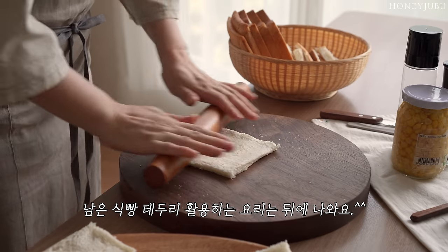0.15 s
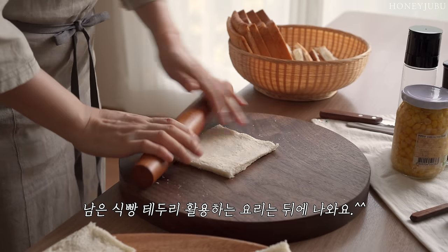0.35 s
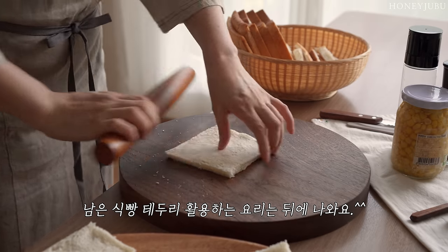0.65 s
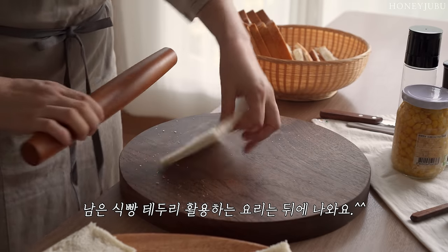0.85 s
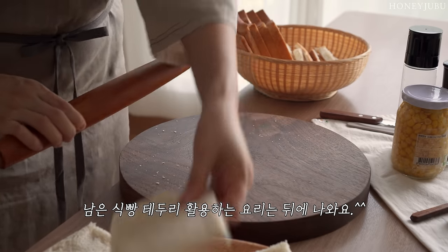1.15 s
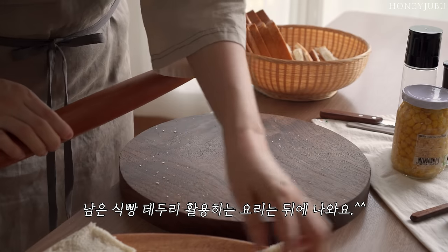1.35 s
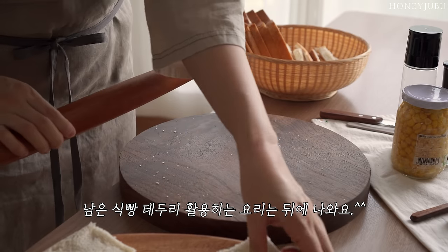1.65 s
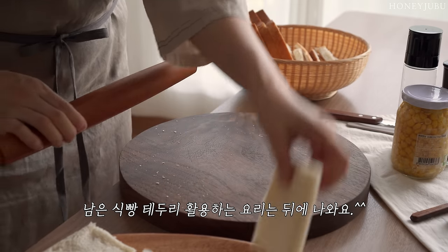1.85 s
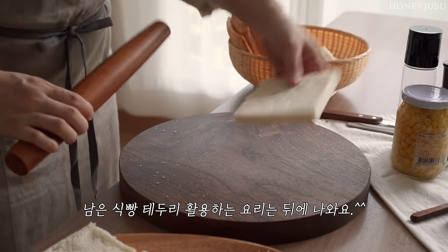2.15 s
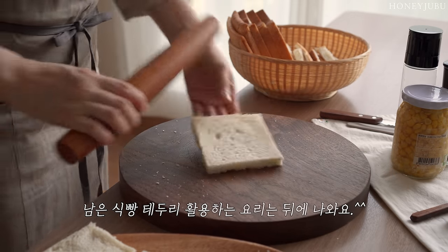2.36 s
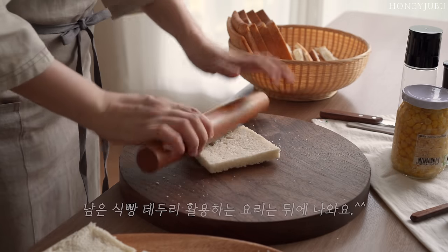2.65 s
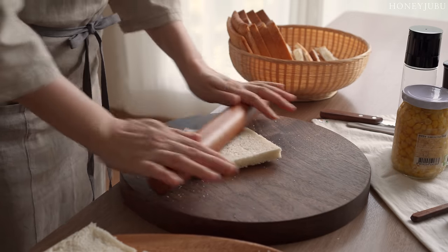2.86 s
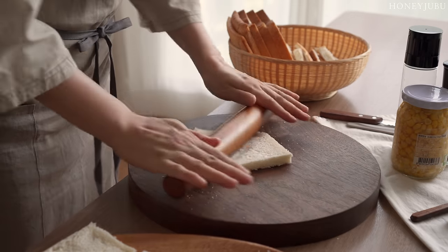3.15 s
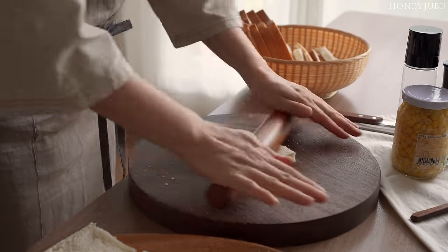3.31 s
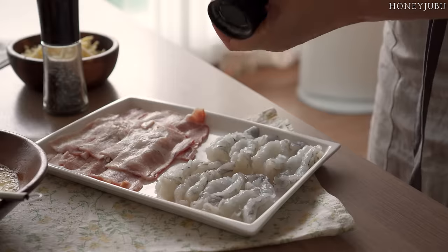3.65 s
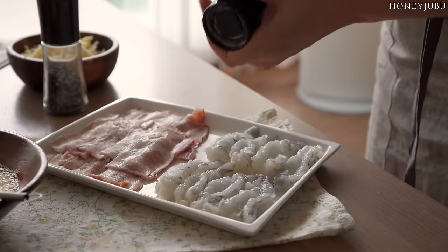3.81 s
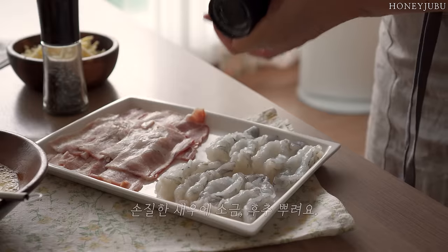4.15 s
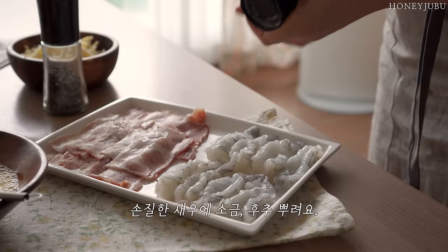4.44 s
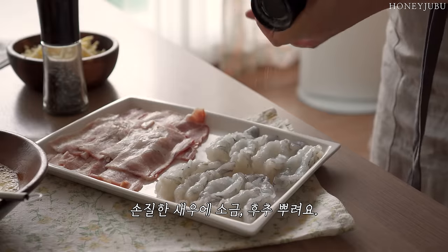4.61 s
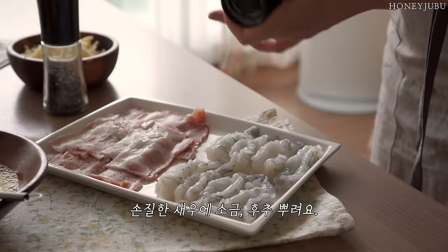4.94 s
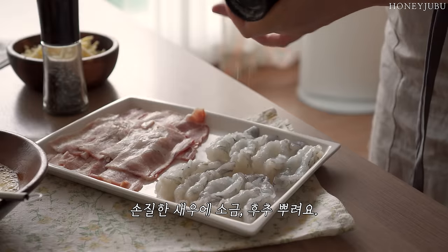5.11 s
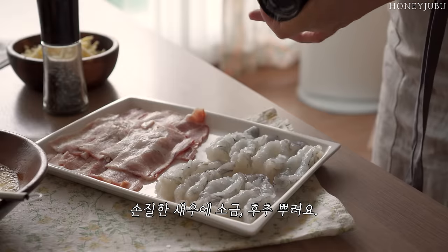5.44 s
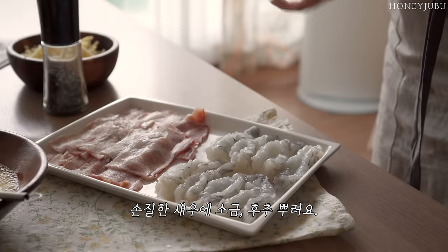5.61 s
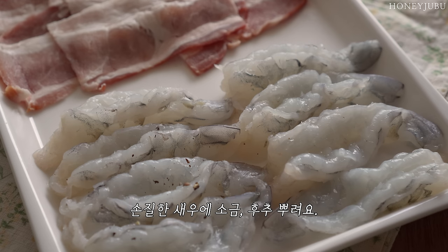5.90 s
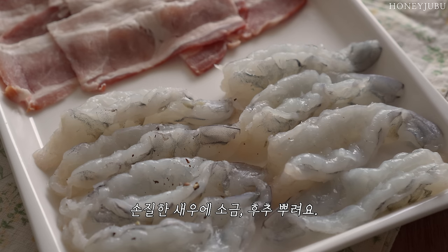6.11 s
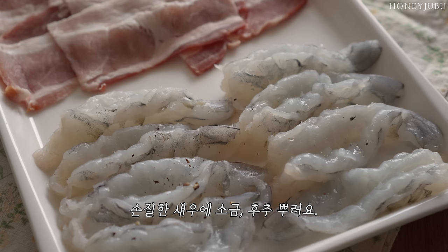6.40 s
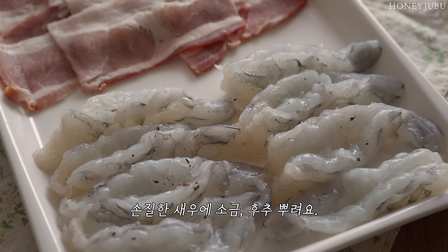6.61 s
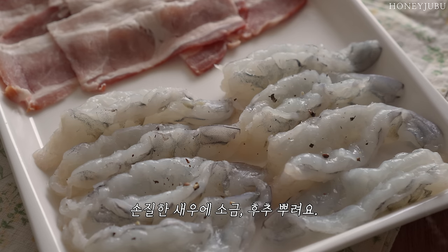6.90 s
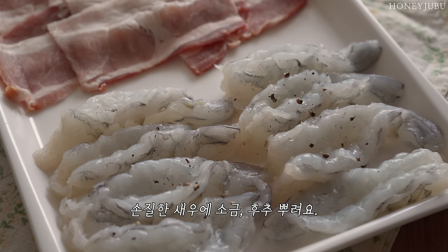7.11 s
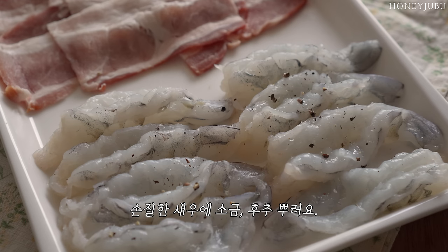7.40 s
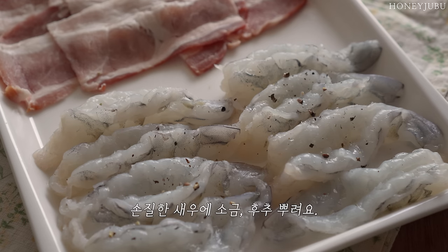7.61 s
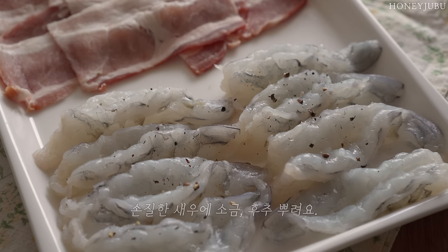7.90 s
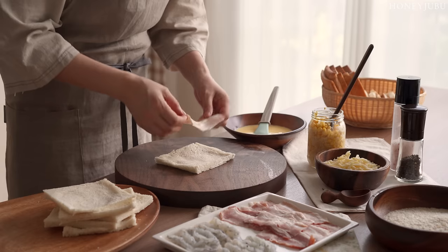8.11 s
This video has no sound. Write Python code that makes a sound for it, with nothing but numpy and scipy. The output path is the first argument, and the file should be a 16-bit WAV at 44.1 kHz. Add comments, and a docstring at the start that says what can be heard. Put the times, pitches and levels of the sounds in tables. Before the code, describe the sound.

A faint hush of fridge and air fills a small kitchen. Right at the start a rolling pin knocks on a thick wooden board, then again, louder, at 0.3 seconds, ringing briefly and bouncing at 0.5. Until about 3.4 seconds fingers and bread slices tap lightly on the board and a plate, clearest twice around 1.6, while palms rub very softly; a dull little knock comes at 3.1. At 3.4 the sound jumps to a salt mill twisted quickly to and fro, about seven strokes a second, with crunching, a bright gritty hiss and sharp cracks of single grains. At 5.8 it changes abruptly to a quieter, drier pepper mill with an even crunch, loud snaps around 6.3 and 6.5, and a very faint tinkle of loose grains. The grinding stops just after 8.1, leaving the hush. Everything is close and louder on the left.

```python
"""Over a faint hush of fridge and air, a rolling pin knocks on a thick wooden board and makes it ring.
Fingers and bread slices tap the board and a plate, and palms rub softly over pin, bread and cloth.
Then a salt mill and a pepper mill are twisted to and fro: grains crush between the burrs (the grinding
teeth), grit hisses and single grains crack. The sound jumps abruptly from one job to the next
and is louder on the left."""
import sys
import numpy as np
from scipy import signal
from scipy.fft import rfft, irfft
from scipy.io import wavfile

SR = 44100
rng = np.random.default_rng(int(sys.argv[2]) if len(sys.argv) > 2 else 0)


def to_wav(sig):
    """Store sig (one row per channel, or 1-D mono) as 16-bit WAV at the path in sys.argv[1].

    Samples outside -1..1 are clipped; the rate is SR.
    """
    pcm = np.clip(np.atleast_2d(sig), -1, 1) * 32767
    pcm = np.round(pcm).astype(np.int16)
    wavfile.write(sys.argv[1], SR, pcm.T)  # frames by channels


N = 364266


def from_db(db):
    """Turn decibels into a gain to multiply by."""
    return 10 ** (np.asarray(db) / 20)


def rms_one(x):
    """Scale a sound to an average (rms) level of 1."""
    return x / np.sqrt(np.mean(x ** 2) + 1e-20)


def spectrum_gains(spectrum, size):
    """Join (Hz, dB) points into one gain for each frequency in a sound of this size."""
    hz, db = np.transpose(spectrum)
    freqs = np.maximum(np.arange(size // 2 + 1) * SR / size, 1)
    return from_db(np.interp(np.log(freqs), np.log(hz), db))


def coloured(x, spectrum):
    """Give a sound the tone colour of these (Hz, dB) points, at level 1."""
    return rms_one(irfft(rfft(x) * spectrum_gains(spectrum, len(x)), len(x)))


def causal_click(spectrum, size=8192):
    """The shortest click with this tone colour (minimum phase)."""
    cepstrum = irfft(np.log(spectrum_gains(spectrum, size)), size)
    cepstrum[1:size // 2] *= 2
    cepstrum[size // 2 + 1:] = 0
    click = irfft(np.exp(rfft(cepstrum)), size)
    return click / np.abs(click).max()


def band(x, low_hz, high_hz):
    """Keep what lies between two frequencies."""
    edges = [low_hz, min(high_hz, .45 * SR)]
    return signal.sosfilt(signal.butter(2, edges, "band", fs=SR, output="sos"), x)


def resonance(x, hz, width_hz):
    """Ring at one pitch; the narrower the width, the longer the ring."""
    r = np.exp(-np.pi * width_hz / SR)
    gain = (1 - r * r) / 2
    return signal.lfilter([gain, 0, -gain], [1, -2 * r * np.cos(2 * np.pi * hz / SR), r * r], x)


def body(x, modes):
    """An object rings at several pitches at once, called its modes."""
    return sum((-1) ** k * from_db(db) * resonance(x, hz, width)
               for k, (hz, width, db) in enumerate(modes))


def grains(per_s, spread_db, bed):
    """Random clicks of uneven size over a bed of smooth noise."""
    sizes = from_db(spread_db * np.minimum(rng.exponential(1, N), 3.2)) * rng.choice([-1, 1], N)
    clicks = sizes * (rng.random(N) < per_s / SR)
    return rms_one(clicks) + bed * rng.standard_normal(N)


def add(out, start_s, peak_db, piece):
    """Lay a short sound in at its time and peak level."""
    i = round(start_s * SR)
    out[i:i + len(piece)] += from_db(peak_db) * piece[:N - i] / np.abs(piece).max()


def strokes(rows, shapes):
    """Hand strokes rise, hold and fall above a resting level. Gives one dB curve per level column."""
    t = np.arange(0, N / SR + .002, .001)
    start, hold, *levels = np.transpose(rows)[:, :, None]
    early, late = np.maximum(start - t, 0), np.maximum(t - start - hold, 0)
    powers = [from_db(2 * rest_db) + from_db(2 * (db - rise * early - fall * late)).sum(axis=0)
              for db, (rise, fall, rest_db) in zip(levels, shapes)]
    return [np.interp(np.arange(N) / SR, t, 10 * np.log10(power)) for power in powers]


# The colour of the hush. Each row: frequency in Hz, relative level in dB.
HUSH_COLOUR = [(15, -12), (25, -8), (55, -4), (74, -9), (92, -6.5), (157, -6.5), (301, -10), (363, -14),
               (476, -17), (796, -20.5), (887, -24.5), (1160, -23.5), (1890, -34), (2050, -33),
               (16000, -47.5)]
# Its level in dB during the bread, the salt, the pepper and the quiet ending.
HUSH_LEVELS = [-63, -60, -65.5, -61.5]
def hush(job):
    """Fridge and air make a low, soft noise, with one level for each job."""
    return from_db(HUSH_LEVELS)[job] * coloured(rng.standard_normal(N), HUSH_COLOUR)


# Background tones. Each row: start and end in seconds, pitch in Hz, width in Hz, level in dB.
HUM_TONES = [(0, 3.42, 99, 30, -66.5), (2.718, 3.5, 1740, 42, -81.5), (2.72, 3.16, 3700, 240, -75.5),
             (3.7, 4.9, 91, 18, -63.5), (4.3, 5.6, 177, 12, -64.5), (5.8, 16, 100.4, 25, -73),
             (8.16, 10.4, 543, 7.1, -68)]
def hums():
    """Noise narrowed to one pitch makes a wavering hum or a faint whistle."""
    t, out = np.arange(N) / SR, 0
    for start, end, hz, width_hz, db in HUM_TONES:
        tone = resonance(resonance(rng.standard_normal(N), hz, width_hz), hz, width_hz)
        fade = np.clip(np.minimum(t - start, end - t) / .0088, 0, 1)
        out = out + from_db(db) * rms_one(tone) * fade
    return out


# Wood hits wood. Each row: start in seconds, level in dB, contact time in milliseconds.
# The last three rows are the pin bouncing.
PIN_KNOCKS = [(.0172, -12.5, .07), (.3345, -4.7, .017), (.549, -30, .15), (.799, -38, .25),
              (1.165, -54, .3), (3.121, -39, .4), (.4925, -24, .22), (.4985, -25, .22), (.513, -29, .18)]
# How pin and board ring. Each row: pitch in Hz, width in Hz, level in dB.
BOARD_MODES = [(217, 24.6, -10), (310, 40, -8.5), (475, 46, -20.5), (555.4, 28, -15), (682, 60, -5.5),
               (1020, 80, 2.5), (1163, 48, 2), (1337, 27, -2), (1690, 180, -1.5), (2360, 160, 2.5),
               (3700, 90, -9), (5650, 39, -21.5)]
# The broad clack of the wood. Each row: frequency in Hz, relative level in dB.
CLACK_COLOUR = [(40, -40), (90, -10.5), (150, -14), (230, -16.5), (600, -7), (850, -16.5), (1350, -10.5),
                (2300, -13.5), (3050, -23), (3700, -24), (4700, -25.5), (5200, -37.5), (5650, -30.5),
                (6300, -50.5), (14000, -72)]
def pin_knocks():
    """The pin hits the board; a longer contact sounds duller. Gives the clack and the ring apart."""
    out, clack = np.zeros((2, N)), causal_click(CLACK_COLOUR)
    t = np.arange(len(clack)) / SR
    for start, level_db, contact_ms in PIN_KNOCKS:
        luck_db = rng.normal(0, 1.5, len(BOARD_MODES))
        ring = sum((-1) ** k * from_db(db + luck_db[k])
                   * np.exp(-np.pi * width * t) * np.sin(2 * np.pi * hz * t)
                   for k, (hz, width, db) in enumerate(BOARD_MODES))
        dulling = np.exp(-1000 / (contact_ms * SR))
        blow = signal.lfilter([1], [1, -2 * dulling, dulling ** 2], [.9 * clack, .52 * ring])
        blow = band(blow, 100, 20000)   # the small pin radiates little bass
        i = round(start * SR)
        out[:, i:i + len(t)] += from_db(level_db) * blow / np.abs(blow[1]).max()
    return out


def burst(out, event, modes, thud_modes, rattle_s, damping):
    """A tiny rattle swells and dies, heard as a ringing crack, a bright snap and a thud."""
    start, peak_db, hz, snap_db, thud_db = event
    t = np.arange(4000) / SR
    swell = t / rattle_s * np.exp(-t / rattle_s) + .087 * np.exp(-t / .005)
    rattle = rng.standard_normal(len(t)) * swell
    rattle[round(rattle_s * SR)] = .9   # the sharp click itself
    struck = [(pitch, width, db + rng.normal(0, 3.5)) for pitch, width, db in modes]
    crack = resonance(rattle, hz, damping * hz) + .55 * body(rattle, struck)
    add(out, start, peak_db, band(crack, 500, 5600))
    add(out, start, peak_db + snap_db, band(rattle, 6900, 11000))
    add(out, start, peak_db + thud_db, body(rattle, thud_modes))


# Light taps. Each row: start in seconds, level in dB, pitch in Hz, then snap and thud in dB
# compared with that level.
FINGER_TAPS = [(0.181, -51.5, 1370, -4, -12), (0.71, -52.5, 4380, -12, 6), (0.863, -53.5, 1364, -19, -18),
               (1.571, -32.5, 1560, -6, -3.5), (1.634, -29, 1260, -31, 2), (1.722, -57, 1250, -33, 18.5),
               (1.962, -56, 1840, -21, -9), (1.974, -55.5, 2350, -26, 6), (2.403, -54.5, 1320, -18, 6),
               (2.529, -62.5, 1228, -24, 9.5)]
# How a fingertip click and the plate ring. Each row: pitch in Hz, width in Hz, level in dB.
TAP_MODES = [(1150, 1900, -3), (2400, 1200, -18), (4300, 1200, 11.5)]
PLATE_MODES = [(244, 62, -15.5), (372, 22, -4.5), (550, 56, -5.5), (718, 33, -4.5), (925, 230, -10)]
def finger_taps():
    """Fingers and slices touch board and plate, and the plate rings briefly."""
    out = np.zeros(N)
    for tap in FINGER_TAPS:
        burst(out, tap, TAP_MODES, PLATE_MODES, rattle_s=.0003, damping=.6)
    return out


# Palms slide. Each row: start and hold in seconds, rub level in dB, dry hiss level in dB.
PALM_STROKES = [(.712, 0.11, -68, -88), (.92, 0.033, -78, -85), (1.17, 0.029, -74.5, -92),
                (1.39, 0.024, -71, -79.5), (1.6, 0.041, -70, -69.5), (1.7, 0.018, -83, -77),
                (1.86, 0.046, -66.5, -76), (2.395, 0.0091, -75.5, -85), (2.46, 0.062, -75.5, -90),
                (2.78, 0.028, -70.5, -82), (2.84, 0.053, -86, -75), (3.01, 0.071, -56.5, -97),
                (3.295, 0.065, -68.5, -88)]
# One row for the rub, one for the hiss: rise and fall in dB per second, resting level in dB.
PALM_SHAPE = [(400, 200, -79.5), (305, 208, -100)]
def palm_rubs():
    """Skin drags over wood and crumb, making a stream of fine, even clicks."""
    rub_db, hiss_db = strokes(PALM_STROKES, PALM_SHAPE)
    drag = grains(per_s=2700, spread_db=3.7, bed=3.1)
    rub = rms_one(body(drag, [(1383, 1750, -3), (2800, 1600, -1), (3856, 750, 0)]))
    hiss = rms_one(band(drag, 3700, 9700))
    return from_db(rub_db) * rub + from_db(hiss_db) * hiss


def uneven_feed(depth_db, every_s):
    """Grains reach the burrs in clumps, so the loudness wanders at random."""
    times = np.arange(0, N / SR + every_s, every_s)
    wander = rng.standard_normal(2000)[:len(times)]
    return from_db(depth_db * np.interp(np.arange(N) / SR, times, wander))


def grind(levels, modes, shell_modes, grit_colour, per_s, spread_db):
    """Crushed grains strike each mode unevenly; the mill's shell grumbles and the dust hisses."""
    crush_db, grit_db, shell_db = levels
    crushed = grains(per_s, spread_db, bed=0)
    strengths = from_db(np.clip(rng.normal(0, 19.7, (len(modes), N)), -30, 8))
    crunch = 0
    for k, (hz, width, db) in enumerate(modes):
        strikes = crushed * strengths[k] + 1.01 * rng.standard_normal(N)
        crunch = crunch + (-1) ** k * from_db(db) * resonance(strikes, hz, width)
    grumble = rms_one(body(.76 * crushed + grains(200, 6, bed=.5), shell_modes))
    hiss = coloured(.3 * crushed + grains(2500, 7, bed=1), grit_colour)
    crunch = rms_one(crunch * uneven_feed(depth_db=2.4, every_s=.012))
    hiss = hiss * uneven_feed(depth_db=2.57, every_s=.015)
    return from_db(crush_db) * crunch + from_db(shell_db) * grumble + from_db(grit_db) * hiss


# Turns of the wrist. Each row: start and hold in seconds, then crush, grit and shell levels in dB.
SALT_TURNS = [(3.42, 0.015, -45.5, -43, -73.5), (3.475, 0.026, -49, -43.5, -53.5),
              (3.575, 0.013, -36, -48, -48.5), (3.695, 0.033, -40.5, -39, -54.5),
              (3.85, .03, -39, -35.5, -48.5), (3.965, 0.063, -38.5, -51, -44.5),
              (4.115, 0.063, -42, -44.5, -53), (4.245, 0.054, -37, -44.5, -47.5),
              (4.395, 0.03, -38.5, -42.5, -52.5), (4.515, 0.059, -34, -40.5, -46.5),
              (4.65, 0.026, -32.5, -41, -44.5), (4.78, 0.041, -37, -42, -53),
              (4.89, 0.041, -39.5, -38, -50), (5.035, 0.041, -37, -46, -50),
              (5.165, 0.037, -40.5, -42, -51.5), (5.325, 0.032, -37.5, -47, -52.5),
              (5.455, 0.049, -36, -41.5, -45.5), (5.575, 0.012, -37.5, -67, -53),
              (5.775, 0.036, -58, -33.5, -76)]
# One row each for crush, grit and shell: rise and fall in dB per second, resting level in dB.
SALT_TURN_SHAPE = [(580, 590, -62.5), (630, 130, -50), (550, 380, -71.5)]
# Loose salt slides. Each row: start and hold in seconds, grit level in dB.
SALT_SLIDES = [(3.51, 0.13, -32), (3.79, 0.13, -39), (4.04, 0.053, -42), (4.715, 0.023, -35),
               (4.965, 0.017, -35), (5.075, 0.055, -36), (5.38, 0.054, -49), (5.625, 0.018, -40),
               (5.7, 0.029, -43)]
# One row for all slides: rise and fall in dB per second, resting level in dB.
SALT_SLIDE_SHAPE = [(597, 1200, -67)]
# How the mill rings and its shell grumbles. Each row: pitch in Hz, width in Hz, level in dB.
SALT_MODES = [(834, 120, -5.5), (1180, 690, 2), (1460, 520, 1.5), (2060, 200, 5.5), (2700, 900, 1.5),
              (3300, 570, -1), (3750, 220, -4.5), (4236, 240, 2.5)]
SALT_SHELL_MODES = [(227, 78, -0.5), (460, 120, -3.5), (638, 400, -6)]
# The hiss of salt grit. Each row: frequency in Hz, relative level in dB.
SALT_GRIT_COLOUR = [(1410, -31), (2400, -9.5), (3490, 0), (3990, 3), (5310, -6), (7470, -4), (9250, -2),
                    (14000, -10), (16000, -10.5)]
def salt_mill():
    """Each twist crushes salt; loose salt sliding inside the mill adds to the hiss."""
    crush_db, grit_db, shell_db = strokes(SALT_TURNS, SALT_TURN_SHAPE)
    slide_db, = strokes(SALT_SLIDES, SALT_SLIDE_SHAPE)
    hiss_db = 20 * np.log10(np.hypot(from_db(grit_db), from_db(slide_db)))
    levels = crush_db, hiss_db, shell_db
    return grind(levels, SALT_MODES, SALT_SHELL_MODES, SALT_GRIT_COLOUR, per_s=500, spread_db=7)


# The loudest single grains. Each row: start in seconds, level in dB, pitch in Hz, then snap and
# thud in dB compared with that level.
GRAIN_CRACKS = [(3.483, -24.5, 1310, -2, -15), (3.499, -38, 3940, -13, -33),
                (3.521, -24.5, 3950, -6, -28.5), (3.576, -41.5, 4040, 11, -35),
                (3.706, -23.5, 3770, -24, -30), (3.715, -8.5, 3580, -22, -19.5),
                (3.811, -27, 4080, 2.5, -18), (3.909, -24, 3010, 1, -41), (3.943, -30, 2710, -20, -16.5),
                (3.973, -10.5, 4040, -12, -34), (3.996, -19, 4320, -5.5, -8),
                (4.001, -12, 1460, -22, -29.5), (4.012, -22, 1030, -3, -40), (4.245, -18, 2800, -24, -42),
                (4.256, -21, 3000, -13, -24), (4.267, -30, 4270, -19, -37.5), (4.292, -29, 3800, -13, -18),
                (4.311, -13, 4030, -17, -38), (4.406, -19.5, 1330, -14, -20.5),
                (4.436, -26.5, 3700, -16, -14), (4.514, -21, 2500, -13, -15), (4.517, -38, 2480, -16, -27),
                (4.537, -10, 1200, -14, -39), (4.55, -23, 1390, -24, -18), (4.555, -56, 2000, -22, -20),
                (4.564, -22, 1280, -17, -16.5), (4.65, -27, 2230, 1, -25), (4.722, -19.5, 3630, 0, -30),
                (4.781, -23, 4040, -21, -21.5), (4.817, -22.5, 1900, -22, -11),
                (4.885, -20.5, 2800, -21, -34), (4.968, -24, 3300, 11, -36), (5.027, -20.5, 3740, -8, -9),
                (5.166, -18, 2250, -15, -35), (5.195, -23, 1080, -19, -25), (5.316, -22, 2730, -17, -47),
                (5.338, -11, 4450, -15.5, -46), (5.341, -10, 1080, -24, -61), (5.464, -19, 2020, -17, -27),
                (5.476, -20.5, 1080, -9, -31), (5.588, -26, 1140, -6, -38), (5.622, -26.5, 5030, 0, -22),
                (5.717, -35, 3470, -18, -27), (5.776, -52, 3730, 1, -41), (5.788, -18.5, 3630, -25, -29),
                (5.8, -27.5, 1830, -25, -25), (5.901, -40, 3480, -3, 1), (5.926, -34, 3380, 1.5, -14),
                (6.003, -44, 4460, -4, -16), (6.029, -28.5, 840, -25, -7.5), (6.154, -41, 2860, 4, 3),
                (6.324, -16, 3960, -15, -30), (6.331, -15.5, 3700, -10.5, -49),
                (6.337, -10.5, 3710, -16, -18), (6.402, -28, 2940, -24, -11.5),
                (6.44, -28.5, 1330, -26, -30), (6.531, -17, 1720, -37, -24), (6.543, -10, 4300, -38, -22),
                (6.814, -27.5, 1700, -25, -6.5), (6.823, -24.5, 3300, -24, -37),
                (6.927, -27.5, 3300, -27, -3.5), (7.013, -38, 3630, -4, -27),
                (7.042, -23.5, 1800, -18, -25), (7.052, -39, 2750, -21, 8.5), (7.183, -29, 3550, -18, -15),
                (7.28, -38, 1020, -12, -12), (7.298, -33, 3300, -16, 0.5), (7.416, -34.5, 2700, -8, -26),
                (7.51, -38, 2800, 6.5, 2), (7.524, -28, 2640, -16, -16), (7.644, -40.5, 1150, -16, -23),
                (7.72, -46, 3540, -7, -2.5), (7.768, -31.5, 2960, -22, -3), (7.922, -41, 3300, -17, -10),
                (8.031, -35, 3710, -16, -21), (8.047, -26.5, 3080, -27, -33)]
def grain_cracks(pepper_from_s):
    """A grain breaks between the burrs and rings whichever mill is in use."""
    out = np.zeros(N)
    for crack in GRAIN_CRACKS:
        is_salt = crack[0] < pepper_from_s
        modes, shell = (SALT_MODES, SALT_SHELL_MODES) if is_salt else (PEPPER_MODES, PEPPER_SHELL_MODES)
        burst(out, crack, modes, shell, rattle_s=.0007, damping=.17)
    return out


# Turns of the wrist. Each row: start and hold in seconds, then crush, grit and shell levels in dB.
PEPPER_TURNS = [(5.79, 0.048, -58, -71, -74), (5.905, 0.029, -48, -45.5, -51.5),
                (6.005, 0.018, -41.5, -45.5, -39.5), (6.15, .045, -48.5, -50, -60),
                (6.245, 0.047, -53, -50.5, -59), (6.334, 0.0064, -47, -55, -56),
                (6.4, 0.032, -45.5, -49.5, -47.5), (6.495, .025, -56, -54.5, -56),
                (6.543, 0.0038, -26, -40, -32), (6.57, 0.049, -48, -80, -58),
                (6.655, 0.054, -48, -51.5, -56), (6.775, 0.022, -54.5, -52.5, -56),
                (6.812, 0.0062, -40, -53, -50), (6.925, 0.032, -44.5, -52.5, -50),
                (7.035, 0.022, -45, -48, -46), (7.16, 0.054, -50.5, -49, -59),
                (7.28, 0.025, -48.5, -48.5, -49.5), (7.415, 0.033, -49.5, -48.5, -51),
                (7.505, 0.016, -45, -51.5, -44.5), (7.645, 0.053, -54.5, -51.5, -62),
                (7.765, 0.019, -50.5, -55.5, -50.5), (7.91, 0.029, -51.5, -51, -57),
                (8.02, 0.032, -46, -52.5, -50), (8.125, .01, -73, -62.5, -77)]
# One row each for crush, grit and shell: rise and fall in dB per second, resting level in dB.
PEPPER_TURN_SHAPE = [(980, 670, -66.5), (1000, 420, -71), (1050, 640, -66.5)]
# How the mill rings and its shell grumbles. Each row: pitch in Hz, width in Hz, level in dB.
PEPPER_MODES = [(920, 1500, -4.5), (1480, 430, 3), (1800, 840, -10), (2710, 1930, 1.5), (3045, 560, 4),
                (3630, 140, 6.5), (4320, 780, -5)]
PEPPER_SHELL_MODES = [(102, 48, -2), (242, 53, 1.5), (342, 78, 7.5), (508, 260, 3.5), (651, 234, 4)]
# The hiss of pepper grit. Each row: frequency in Hz, relative level in dB.
PEPPER_GRIT_COLOUR = [(2650, -6), (4500, -0.5), (5140, -11.5), (7100, -0.5), (10900, -6), (14800, -14),
                      (16000, 0)]
def pepper_mill():
    """Pepper crushes in a denser, more even stream than salt, while loose grains tinkle."""
    levels = strokes(PEPPER_TURNS, PEPPER_TURN_SHAPE)
    grinding = grind(levels, PEPPER_MODES, PEPPER_SHELL_MODES, PEPPER_GRIT_COLOUR, per_s=740, spread_db=4)
    return grinding + jar_tinkle(grit_db=levels[1])


# The jar's ring: width in Hz, base level in dB, share of the grit's level swings that it follows.
JAR_RING = (200, -70.5, .45)
def jar_tinkle(grit_db, from_s=6.38, pitch_hz=8420):
    """Small hard grains tick against the glass jar and ring one high note, louder during a twist."""
    width_hz, base_db, share = JAR_RING
    ticks = rms_one(resonance(grains(200, 5, bed=.3), pitch_hz, width_hz))
    level_db = base_db + share * (grit_db - grit_db.mean())
    return from_db(level_db) * ticks * (np.arange(N) > from_s * SR)


# The kitchen's echo. Each row: frequency in Hz, seconds it takes to fade by 60 dB.
ECHO_TIMES = [(150, 0.22), (400, 0.39), (1040, 0.6), (2760, 0.34), (7280, 0.23)]
def room(x):
    """The echo is noise that dies away, each half octave at its own rate."""
    t, edges = np.arange(SR) / SR, 60 * 2 ** np.arange(0, 8.1, .5)
    hz, fade_times = np.transpose(ECHO_TIMES)
    echo = 0
    for low, high in zip(edges, edges[1:]):
        fade_s = np.interp(np.log(low * high) / 2, np.log(hz), fade_times)
        echo = echo + band(rng.standard_normal(SR), low, high) * from_db(-60 * t / fade_s)
    echo = echo * np.clip((t - .003) / .004, 0, 1)   # the first walls are a metre or two away
    return signal.fftconvolve(x, echo / np.sqrt(np.sum(echo ** 2)))[:N]


# Three times in seconds: the salt starts, the pepper starts, the pepper ends.
JOB_CHANGES = [3.4255, 5.805, 8.141]
def scene():
    """Bread, salt, then pepper: each job sounds with its echo until the sound jumps on."""
    job = np.searchsorted(JOB_CHANGES, np.arange(N) / SR)
    in_bread, in_salt, in_pepper = job == 0, job == 1, job == 2
    clack, ring = pin_knocks()
    taps = finger_taps()
    cracks = grain_cracks(pepper_from_s=JOB_CHANGES[1])
    bread_echo = room(from_db(6) * clack + from_db(-20) * ring + from_db(-5.5) * taps)
    bread = .35 * clack + ring + taps + bread_echo + palm_rubs()
    salt = salt_mill() + cracks * in_salt
    pepper = pepper_mill() + cracks * in_pepper
    salt = salt + from_db(-12.5) * room(salt)
    pepper = pepper + from_db(-19) * room(pepper)
    mono = bread * in_bread + salt * in_salt + pepper * in_pepper + hush(job) + hums()
    return mono * from_db([[3], [-6.5]])   # left, right


def record(dry):
    """Each channel gains a little noise of its own, and the highest treble is cut."""
    noise = from_db(-73.5) * signal.lfilter([.05], [1, -.97], rng.standard_normal((2, N)))
    cutoff_hz = 16300
    return signal.sosfilt(signal.cheby2(24, 90, cutoff_hz, fs=SR, output="sos"), dry + noise)


dry = scene()
out = record(dry)
to_wav(out)
```